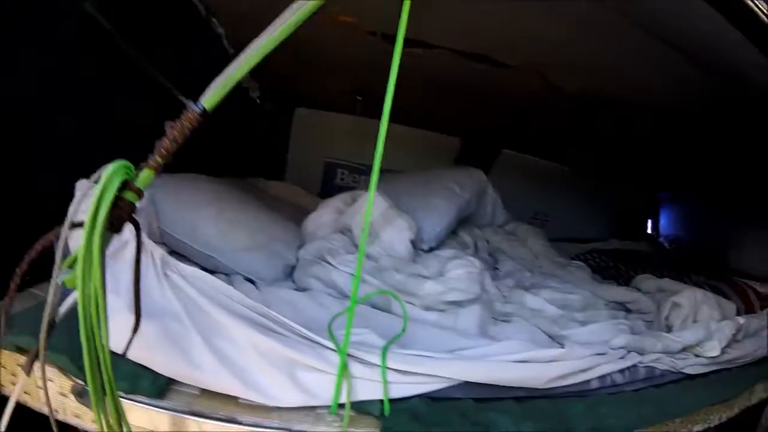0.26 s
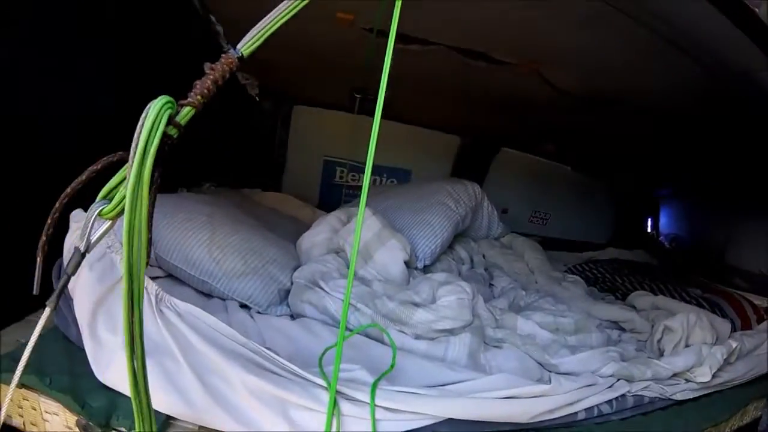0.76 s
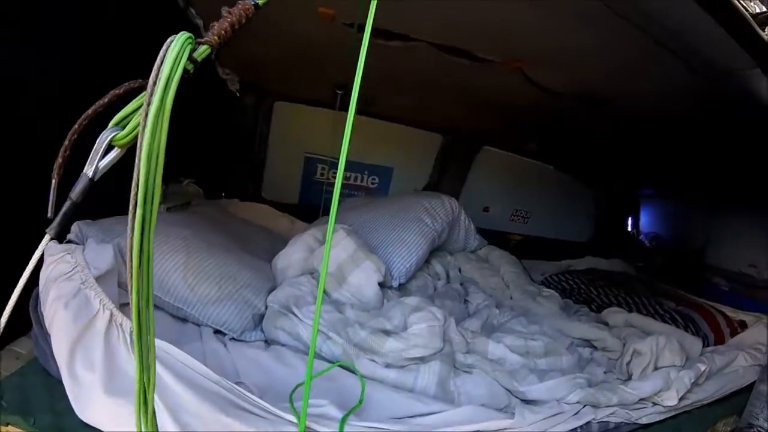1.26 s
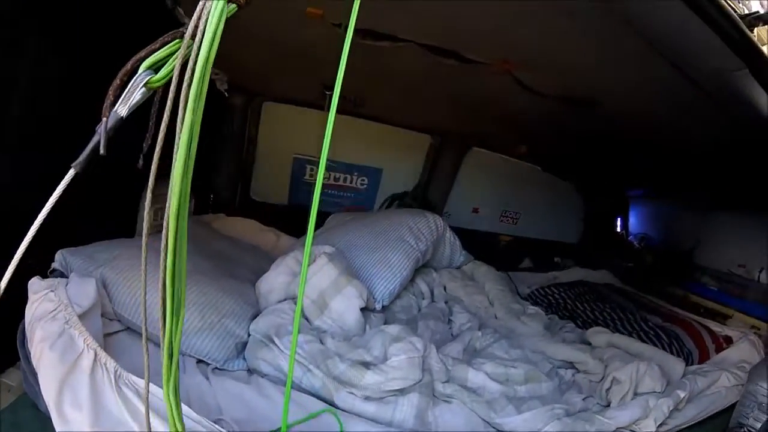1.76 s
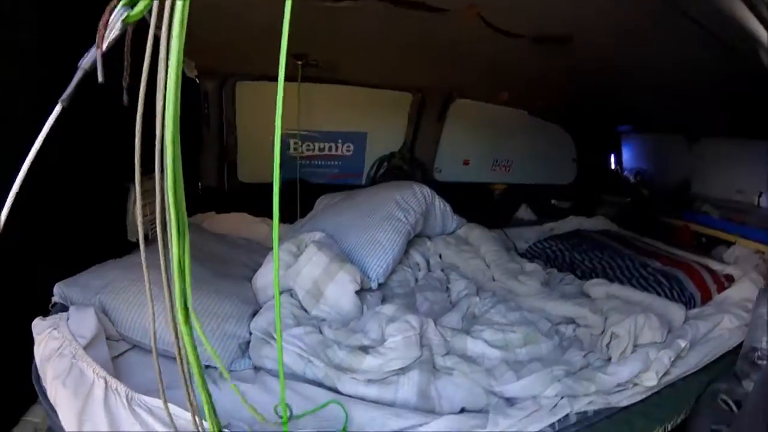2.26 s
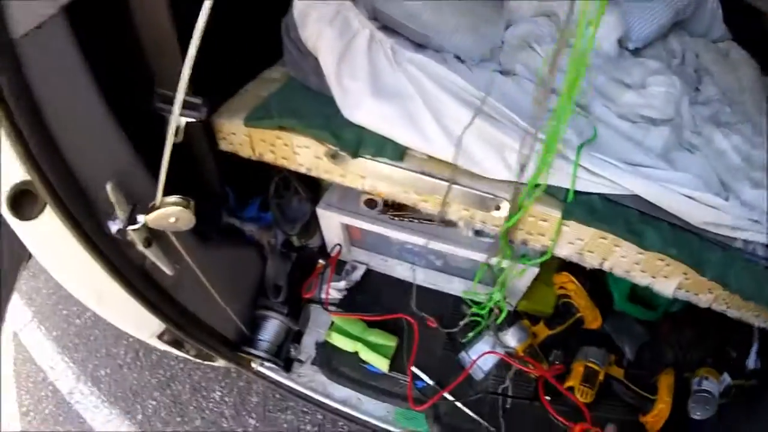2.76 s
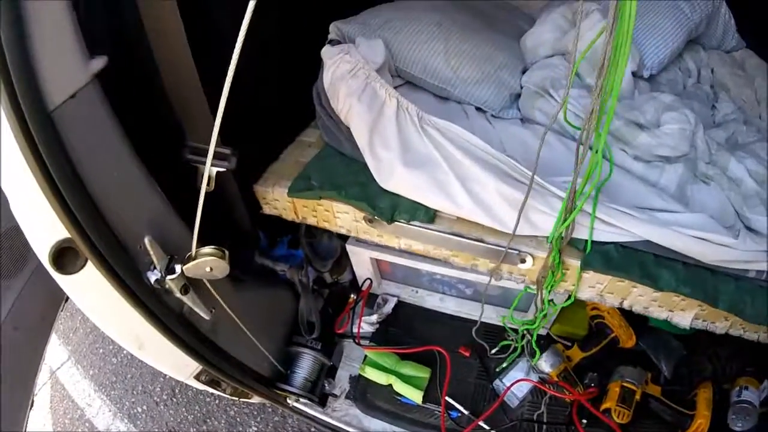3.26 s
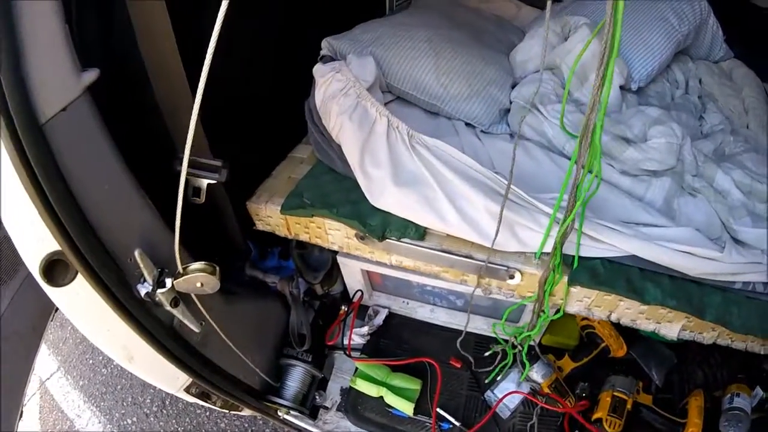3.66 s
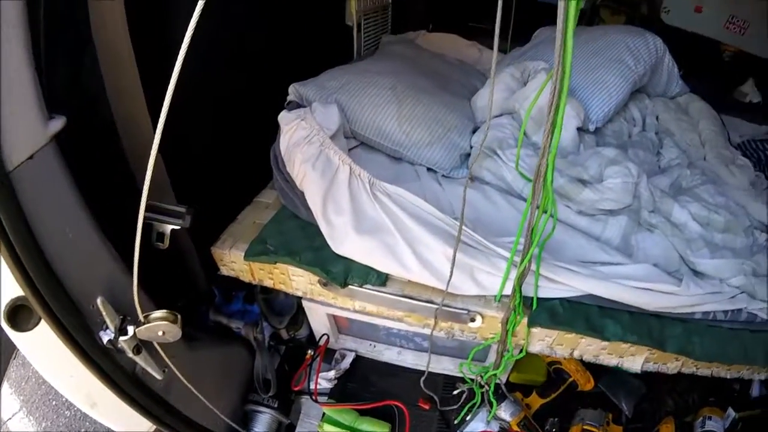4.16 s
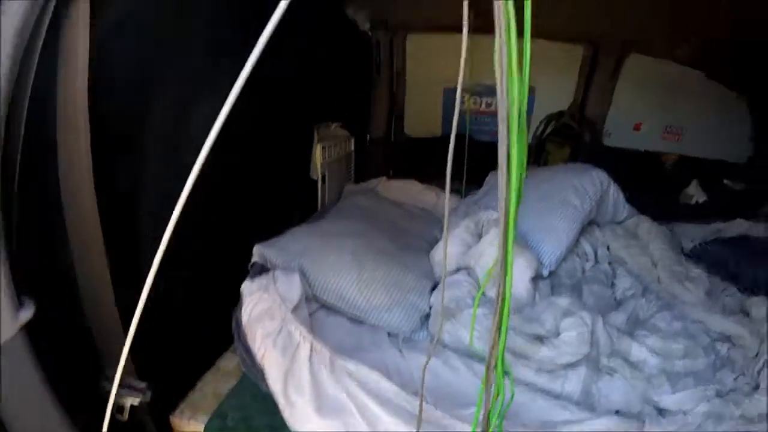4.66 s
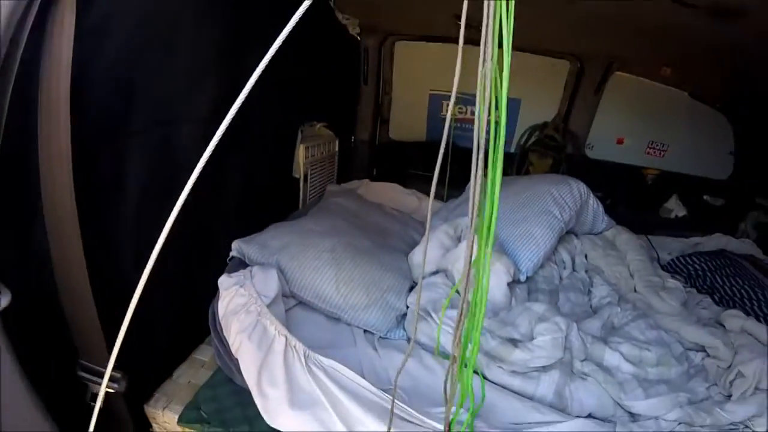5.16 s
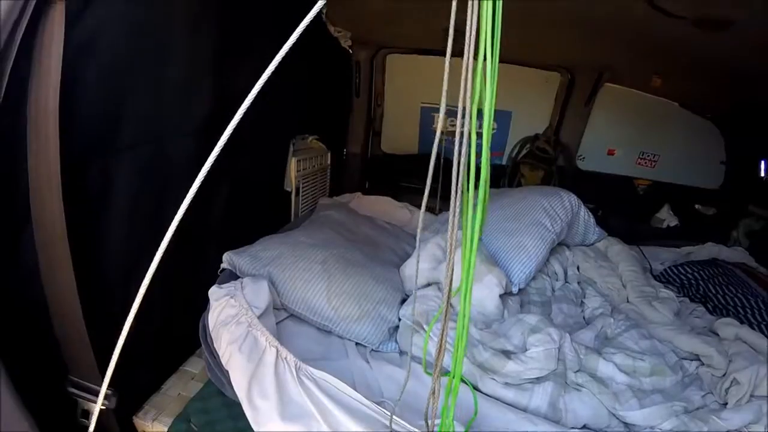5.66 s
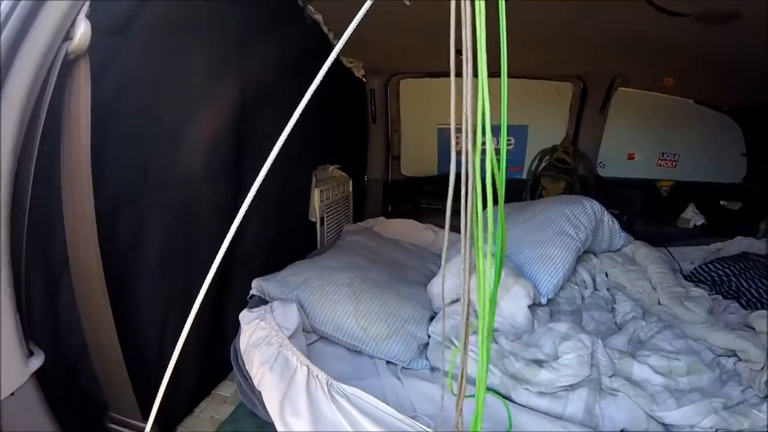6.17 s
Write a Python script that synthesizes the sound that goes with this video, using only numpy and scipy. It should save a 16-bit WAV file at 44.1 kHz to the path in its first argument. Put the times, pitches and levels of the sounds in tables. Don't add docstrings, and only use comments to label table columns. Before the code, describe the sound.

Steady gritty motor whine cuts out with a knock and winds down; two brief whirring bursts follow above a booming idling engine.

```python
import sys
import numpy as np
from scipy import signal
from scipy.fft import rfft, irfft
from scipy.io import wavfile
from scipy.ndimage import uniform_filter1d

SR = 44100
rng = np.random.default_rng(int(sys.argv[2]) if len(sys.argv) > 2 else 0)


def ratio_of_db(decibels):
    return 10 ** (np.asarray(decibels, float) / 20)


def waveform_to_disk(signal):
    frames = np.transpose(np.atleast_2d(signal))
    scaled = np.clip(frames, -1, 1) * 32767
    samples = np.round(scaled).astype(np.int16)
    wavfile.write(sys.argv[1], SR, samples)


N = 282240
FULL_HZ = 480

# (frequency [Hz], width [Hz], level [dB])
HOUSING = [(261.4, 23, 8.5), (358.2, 17, 12.5), (414, 41, 4), (512.4, 87, 4.5), (618, 130, -3),
           (795, 33, 9.5), (877.6, 44, 10.5), (1165, 27, 5.5), (1520, 430, 3), (1810, 320, 8),
           (2400, 200, -8.5), (3440, 130, 2)]
# (time [s], share [0-1])
FACING = [(0, 0.08), (2.5, 0.11), (2.7, 0.5), (3.4, 0.8), (4.4, 0.1), (4.9, 0.13), (5.6, 0.37), (5.9, 0.04),
          (6.4, 0.66)]


def level(x, db):
    return x * ratio_of_db(db) / np.sqrt(np.mean(x ** 2))


def band(x, hz, width):
    return signal.lfilter(*signal.iirpeak(hz, hz / width, fs=SR), x)


def body(x, modes):
    return sum(ratio_of_db(db) * band(x, hz, width) for hz, width, db in modes)


def noise(points):
    hz, db = np.transpose(points)
    f = np.maximum(np.arange(N // 2 + 1) * SR / N, 1)
    gain = ratio_of_db(np.interp(np.log(f), np.log(hz), db))
    return irfft(rfft(rng.standard_normal(N)) * gain, N)


def walk(rate):
    steps = np.arange(N // 32 + 2) * 32
    k = max(int(SR / 32 / rate), 1)
    held = np.repeat(rng.standard_normal(len(steps) // k + 1), k)[:len(steps)]
    smooth = uniform_filter1d(uniform_filter1d(held, k), k)
    return 1.3 * np.interp(np.arange(N), steps, smooth)


def columns(rows):
    s, *values = np.transpose(sorted(rows))
    return [np.interp(np.arange(N) / SR, s, v) for v in values]


def winch():
    tooth_hz = pinion_speed()
    rasp_db, bright_db, low_db, whine_db, side_db, over_db = working(tooth_hz)
    turn = 2 * np.pi * np.cumsum(tooth_hz / 16) / SR
    turn = turn + .012 * walk(20) + .007 * walk(90)
    whine = tooth_whine(turn, tooth_hz, side_db, over_db) * ratio_of_db(whine_db)
    grit = brush_grit(turn)
    rasp = housing_rasp(grit, turn, low_db, bright_db)
    whistle = np.sin(2 * np.pi * 14040 * np.arange(N) / SR) * ratio_of_db(-68 + 2.3 * whine_db)
    return ratio_of_db(rasp_db) * (whine + rasp + pulley(grit) + whistle)


def pinion_speed():
    # (time [s], tooth rate [Hz])
    long_run = [(0.15, 477), (0.75, 479.6), (1.35, 481.3), (1.55, 480.8), (1.9, 478), (2.15, 478.7),
                (2.4, 480.5), (3.15, 482.3), (3.35, 479.7)]
    # (time [s], tooth rate [Hz])
    coast = [(3.45, 475), (3.51, 472), (3.56, 418), (3.658, 333.5), (3.716, 282), (3.752, 259),
             (3.894, 160), (3.98, 119), (4.15, 40)]
    # (time [s], tooth rate [Hz])
    burst = [(4.96, 280), (4.994, 395), (5.074, 435), (5.176, 467), (5.28, 460), (5.332, 423), (5.406, 336),
             (5.498, 243), (5.68, 45)]
    # (time [s], tooth rate [Hz])
    loaded = [(5.905, 191.0), (5.941, 277.9), (5.973, 361.4), (5.987, 388.7), (6.031, 417.7),
              (6.187, 418.3), (6.227, 408.5), (6.377, 410.0), (6.4, 400.9)]
    return columns(long_run + burst + loaded + coast)[0]


def working(tooth_hz):
    # (time [s], level [dB])
    effort = [
        [(0, -21), (0.65, -21), (1.2, -22), (1.9, -20.5), (2.5, -22), (2.72, -18.5), (3.3, -23), (3.33, -28),
         (3.404, -33)],
        [(3.46, -25), (3.57, -21.5), (3.75, -20.5), (4.0, -21), (4.2, -26), (4.3, -70)],
        [(4.958, -71), (4.964, -39), (5.0, -35), (5.25, -24.5), (5.42, -20), (5.55, -21.5), (5.72, -30)],
        [(5.895, -59), (5.912, -20.5), (5.933, -18), (6.05, -19.5), (6.1, -22), (6.4, -22.5)],
    ]
    # (start [s], bright rasp [dB re rasp], low rasp [dB re rasp], whine [dB re rasp],
    # overtones [dB])
    stretches = [(0, -7, -3.5, 4.5, 0), (0.7, -9.5, -3.5, 3.5, 3.5), (1.25, -6.5, -5.5, 1, 2.5),
                 (1.7, -6, -6.5, 5, -1.5), (2.55, -8, -6, 0.5, 5.5), (3.0, -5, -9, 3, -3),
                 (3.33, -13, -4, -9, 13), (3.53, -15, -3.5, -3.5, 13.5), (3.66, -17, -2, -2, 15),
                 (3.79, -18.5, 1.5, -4.5, 10.5), (4.6, -12, 2, 0, 4.5), (5.04, -13.5, -2, 8.5, -2),
                 (5.24, -12, -1.5, 6.5, 4), (5.37, -11.5, -3, 13.5, -1.5), (5.438, -11, 1.5, 3.5, 11.5),
                 (5.8, -10.5, -1.5, 3, 3), (6.001, -9.5, -4.5, 14.5, -11), (6.2, -8.5, -1, 12.5, 2),
                 (6.345, -9, -3.5, 5.5, 11.5)]
    speed = tooth_hz / FULL_HZ
    rasp_db = columns(sum(effort, []))[0] + 11 * np.log2(speed)
    rows = np.array(stretches)
    current = np.searchsorted(rows[:, 0], np.arange(N) / SR, "right") - 1
    held = rows[np.maximum(current, 0), 1:]
    blend_s = 0.025
    bright_db, low_db, whine_db, over_db = uniform_filter1d(held, int(blend_s * SR) + 1, axis=0).T
    low_db = low_db + 7.5 * (1 - speed)
    side_db = -0.7 - 0.52 * whine_db
    return rasp_db, bright_db, low_db, whine_db, side_db, over_db


def tooth_whine(turn, tooth_hz, side_db, over_db):
    # (multiple of the turn, level [dB])
    mesh = [(16, 0), (32, -11), (48, -6), (64, -16), (80, -16), (96, -22), (112, -19)]
    # (multiple of the turn, level [dB])
    sides = [(14, -17.5), (15, 3), (17, -4), (18, -14), (29, -22.5), (31, -3), (33, -2.5), (46, -27.5),
             (47, -22), (49, -6.5), (65, -14), (79, -8.5), (113, -11)]

    def tones(orders, blur=0):
        return sum(ratio_of_db(db + 2.76 * walk(18)) * np.sin(k * (turn + blur) + k * k) for k, db in orders)

    slowing = 1 - tooth_hz / FULL_HZ
    chatter = sum(ratio_of_db(db) * walk(110) * np.sin(k * turn) for k, db in mesh)
    high = tones(mesh[3:], 0.017 * walk(70))
    rattle = band(band(high, 950, 990), 950, 990) * slowing
    overtones = tones(mesh[1:3]) + high + ratio_of_db(15) * rattle
    whine = tones(mesh[:1]) + ratio_of_db(over_db) * overtones + ratio_of_db(side_db) * tones(sides)
    whine = whine + ratio_of_db(-8) * chatter
    loose = np.clip(slowing * 20, 0, 1)
    lurch = 0.32
    whine = whine * (1 + lurch * loose * np.cos(turn + 1.6))
    return level(0.051 * whine + body(whine, HOUSING), 0)


def brush_grit(turn):
    # (frequency [Hz], density [dB per Hz])
    colour = [(100, -57), (250, -9.5), (450, 0), (700, -15.5), (1000, -5.5), (1500, -14.5), (2100, -19.5),
              (5400, -23.5), (6600, -25), (9000, -29.5), (10600, -41.5), (11500, -60.5), (14200, -60),
              (14600, -110)]
    # (frequency [Hz], width [Hz], level [dB])
    behind_rings = [(1362, 53, 10.5), (3173, 243, 1), (4850, 320, -2), (6510, 230, 12.5)]
    # (frequency [Hz], width [Hz], level [dB])
    open_rings = [(775, 100, 11.5), (1130, 70, 0.5), (2385, 110, 10), (3200, 310, 10.5), (4370, 250, 10.5),
                  (4820, 260, 5), (5940, 210, 9), (7400, 2100, 2)]
    facing = columns(FACING)[0]
    depth = 0.19 + 0.088 * facing
    turn_throb = 1 + depth * np.cos(turn + 3.9 + .3 * walk(12))
    tooth_throb = 1 + .22 * np.cos(16 * turn)
    grit = noise(colour)
    rings = (1 - facing) * body(grit, behind_rings) + facing * body(grit, open_rings)
    return (grit + rings) * turn_throb * tooth_throb


def housing_rasp(grit, turn, low_db, bright_db):
    def split(hz, kind):
        return signal.sosfilt(signal.butter(3, hz, kind, fs=SR, output="sos"), grit)

    low, mid, bright = split(1600, "low"), split((1600, 5000), "band"), split(5000, "high")
    surge = ratio_of_db(0.54 * walk(22))
    low = level(low + .5 * body(low, HOUSING), 0) * ratio_of_db(low_db + 1.44 * walk(17))
    mid = level(mid, -1.1) * surge
    bright = bright * (1 + 0.57 * columns(FACING)[0] * np.maximum(np.cos(turn + 3.5), 0) ** 2)
    bright = level(bright, 0) * ratio_of_db(bright_db + 1.3 * walk(33)) * surge
    return low + mid + bright


def pulley(grit):
    # (start [s], stop [s], frequency [Hz], width [Hz], level [dB re rasp])
    spells = [
        (0.35, 0.945, 3155, 220, -16.5),
        (1.466, 2.62, 3273, 258, -10),
    ]
    t = np.arange(N) / SR
    out = np.zeros(N)
    for start, stop, hz, width, db in spells:
        fade = np.clip(np.minimum(t - start, stop - t) / 0.023, 0, 1)
        out += level(band(band(grit, hz, width), hz, width), db) * fade
    return out


def clicks():
    # (time [s], peak level [dB])
    knocks = [
        (3.468, -12.5),
        (4.961, -28),
        (5.916, -23),
    ]
    hits = np.zeros(N)
    for s, db in knocks:
        start = int(s * SR)
        decay = np.exp(-np.arange(400) / 90)
        hits[start:start + 400] = ratio_of_db(db - 8) * rng.standard_normal(400) * decay
    hits = band(band(hits, 2000, 4000), 2000, 4000)
    return hits + 2.3 * body(hits, HOUSING)


def engine():
    # (multiple of the firing rate, level [dB])
    firing = [(1, -21), (2, -14), (3, -14.5), (4, 1), (5, 1.5), (6, -9), (7, -17.5), (8, -36), (9, -42),
              (10, -24), (11, -47), (12, -22), (13, -24), (14, -18), (15, -51)]
    # (frequency [Hz], width [Hz], level [dB])
    cabin = [(25, 20, -38), (54.7, 30, -24), (85, 32.7, 6.5), (137, 36, -26), (250, 170, -19.5),
             (390, 31.5, -40)]
    # (time [s], level [dB])
    boom_level = [(0, -25.5), (0.55, -22), (0.85, -23.5), (2.3, -23.5), (2.48, -22.5), (2.6, -22),
                  (3.8, -22.5), (4.25, -21.5), (4.5, -24.5), (5.3, -24), (6.0, -23.5), (6.15, -26),
                  (6.4, -27)]
    firing_hz = 19.57 * (1 + 0.00783 * walk(3))
    boom_db = columns(boom_level)[0]
    cycles = 0.2706 + np.cumsum(firing_hz) / SR
    boom = np.zeros(N)
    for k, db in firing:
        boom += ratio_of_db(db + 2.0 * walk(7.7)) * np.sin(2 * np.pi * k * cycles + 0.87 * walk(6))
    rumble = body(band(rng.standard_normal(N), 88, 160), cabin)
    tick = np.exp(-(cycles % 1) / 0.97) * band(rng.standard_normal(N), 6650, 500)
    return (level(boom, 0) + level(rumble, -8.5)) * ratio_of_db(boom_db) + level(tick, -64.5)


def air():
    # (frequency [Hz], density [dB per Hz])
    air_colour = [(80, -33), (140, -16), (240, -35), (360, -13.5), (700, -19), (1400, -19.5), (2000, -23),
                  (3400, -31), (5000, -36), (10800, -49), (11500, -45.5), (14200, -54), (14600, -110)]
    return level(noise(air_colour) * ratio_of_db(0.2 * walk(8.6)), -45.5)


def scene():
    near = winch() + clicks()
    walls = ((.0071, -19.5), (.0127, -26.5), (.021, -25.5))  # (delay [s], level [dB])
    echoes = sum(ratio_of_db(db) * np.roll(near, int(s * SR)) for s, db in walls)
    return (near + echoes + engine() + air())[None]


def low_pass(x):
    return signal.sosfilt(signal.butter(12, 14450, fs=SR, output="sos"), x)


def record(dry):
    mix = np.tanh(.8 * dry) / .8
    return low_pass(mix)


dry = scene()
out = record(dry)
waveform_to_disk(out)
```